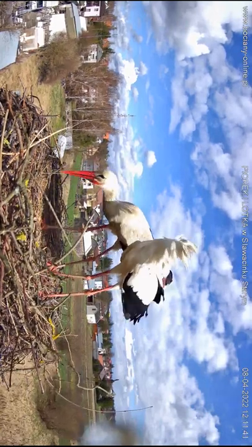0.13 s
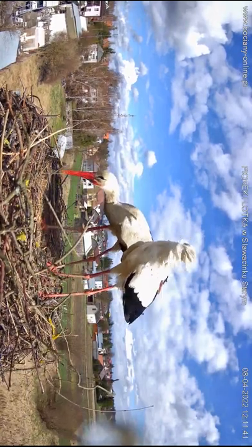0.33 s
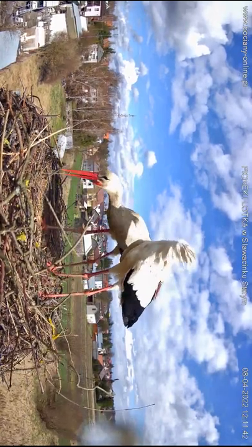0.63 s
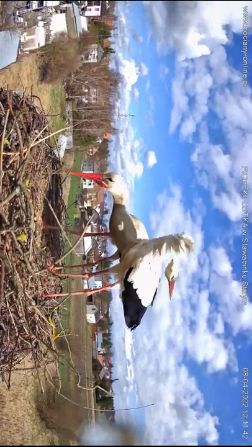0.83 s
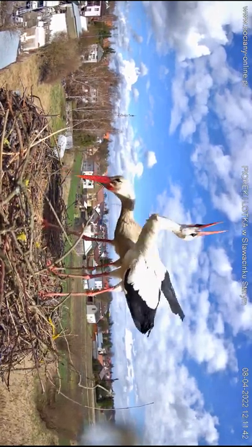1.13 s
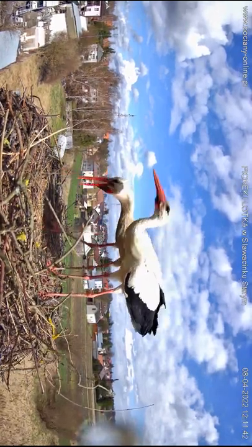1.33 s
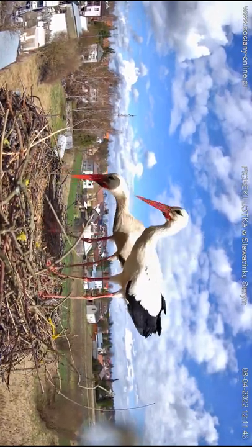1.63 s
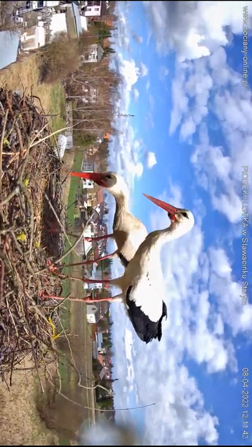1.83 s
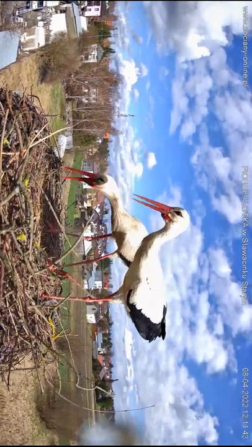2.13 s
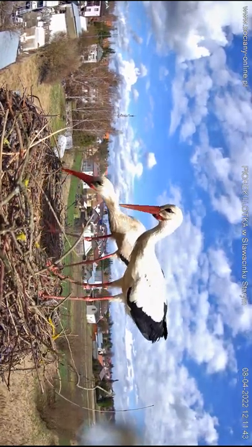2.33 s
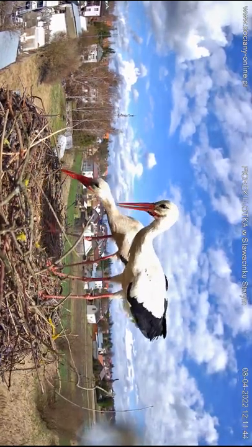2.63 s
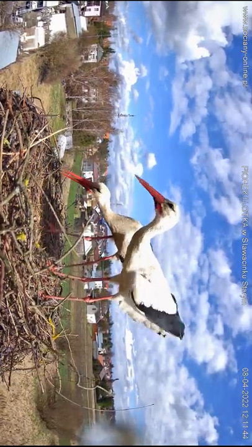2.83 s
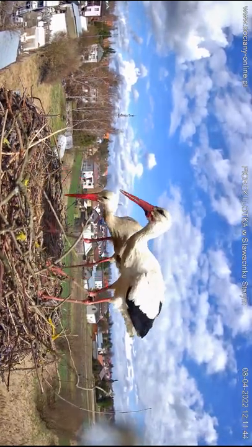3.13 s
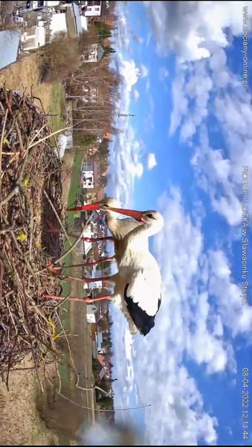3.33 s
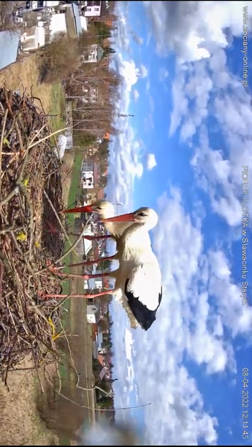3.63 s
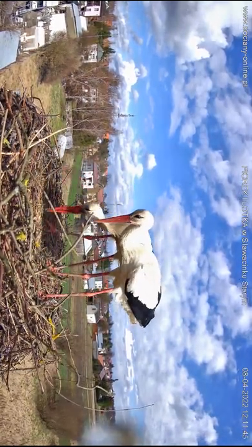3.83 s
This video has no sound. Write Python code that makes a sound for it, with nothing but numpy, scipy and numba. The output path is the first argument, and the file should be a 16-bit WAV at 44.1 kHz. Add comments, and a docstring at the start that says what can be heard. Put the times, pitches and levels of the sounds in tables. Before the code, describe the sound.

Two storks clatter their bills at an outdoor nest, one clapping hollowly, the other ticking dryly. Loud clacks overload the close microphone, with brief hisses between them, then thin to a few ticks over gusting wind and low rumble.

```python
"""Two storks clatter their bills on a nest, over gusting wind, a faint far hum and a low rumble.
From the start, one keeps its head low and claps hollowly; the other ticks dryly, head thrown back.
As that head comes forward, the ticks slow down and fill out, and loud clacks overload a close microphone.
Midway, three short hisses pass between the clacks. The hollow claps stop at about two seconds;
the other stork ends with a few spaced ticks, and the last second is left to the background."""
import sys
import numpy as np
from scipy import signal
from scipy.fft import irfft
from scipy.io import wavfile
from scipy.ndimage import uniform_filter1d
from numba import njit

SR = 44100
rng = np.random.default_rng(int(sys.argv[2]) if len(sys.argv) > 2 else 0)


def int16_out(signal):
    """Quantize to a 16-bit WAV file."""
    q = np.round(np.clip(np.atleast_2d(signal).T, -1, 1) * 32767)
    wavfile.write(sys.argv[1], SR, q.astype(np.int16))


N = 176400  # 4 seconds

# how the wind swells and drops: (time [s], bass level [dB], rush level [dB])
GUST_LEVELS = [(0, 9.5, 10.5), (.06, 6, 6), (.11, 8, 8), (.15, 5, 6), (.55, -0.5, 3), (.8, -1, 4),
               (1.08, 0, 1), (1.2, -8, -9.5), (1.34, -6.5, -10), (1.44, -8, -3.5), (1.7, -4, -5),
               (1.89, -9.5, -8), (2.07, 1.5, -0.5), (2.12, 5.5, 5.5), (2.16, 7, 8), (2.19, 1.5, 2.5),
               (2.38, 1, 2.5), (2.52, 6.5, 5), (2.65, 7.5, 2.5), (2.73, -1, 1.5), (2.88, -4.5, -3),
               (2.95, -3.5, -1), (3.22, 1.5, 2), (3.36, -5.5, -6.5), (3.42, -3, 0), (3.56, -1, -1.5),
               (3.65, -3, -0.5), (3.72, -5, -4), (4, 0, 0)]


def bowed_stork():
    """Hollow claps: the bill snaps shut and rings the pouch (loose skin below it) and the throat."""
    # the claps: (time [s], level [dB])
    claps = [(0.084, 0), (0.217, 1.5), (0.3471, 1.5), (0.4772, 2.5), (0.6125, 4), (0.7459, 5),
             (0.8789, 6.5), (1.015, 6.5), (1.1509, 5.5), (1.2857, 5.5), (1.4182, 6), (1.5528, 6.5),
             (1.686, 6), (1.8183, 5), (1.9642, 4)]
    # the pitches sink as the neck stretches:
    # (time [s], throat pitch [Hz], pouch pitch [Hz], pouch level [dB], throat level [dB])
    stretch = [(.08, 1660, 2437, -2.5, 3.5), (.22, 1680, 2454, -4.5, 2.5), (.48, 1665, 2446, 0.5, 3),
               (.75, 1589, 2424, 2, 1), (1.15, 1582, 2318, 1, 0), (1.69, 1575, 2290, 1.5, -0.5),
               (1.96, 1490, 2246, 4, -1.5)]
    # bright, harsh upper tones of the overloaded clap: (pitch [times the pouch pitch], level [dB])
    harsh_tones = [(1.298, -4.5), (1.648, -4)]
    out, t = np.zeros(N), np.arange(SR // 20) / SR
    for start, db in claps:
        throat_hz, pouch_hz, pouch_db, throat_db = values_at(stretch, start)
        # the pouch's pitch scoops up as the bill seals
        pouch = ring(t, pouch_hz, t60=0.013, rise_s=0.004, scoop=0.15, scoop_s=0.0022, ease=1.724)
        throat = ring(t, throat_hz, t60=0.017, rise_s=0.0021)
        tones = amp(16 + pouch_db) * pouch + amp(throat_db) * throat
        for ratio, tone_db in harsh_tones:
            strength = amp(tone_db + 2.1 * rng.standard_normal())
            tones += strength * ring(t, ratio * pouch_hz, t60=0.012, rise_s=0.0014)
        low_knock = amp(-19.5) * ring(t, hz=727, t60=0.019, rise_s=0.0011)
        snap = amp(-17) * crack(t, t60=0.012, tail_db=-3.5, tail_t60=0.031) + amp(-14) * bill(t)
        add(out, start, amp(db) * (tones + low_knock + snap))
    return out


def displaying_stork():
    """Dry ticks that slow down and ring longer as the head comes forward."""
    # the claps: (time [s], level [dB], extra level of the snap [dB])
    claps = [(0.105, -7.5, -1.5), (0.2035, -6, 1), (0.304, -4.5, -1), (0.4036, -6.5, 1),
             (0.5055, -3.5, 1.5), (0.6104, -3, -7), (0.7195, -8, 2), (0.8344, -7, 2.5), (0.955, -3, 3),
             (1.085, -3, -2), (1.2247, -3, -1), (1.3709, -1, -5), (1.52, -15.5, 9.5), (1.6601, 5, -3),
             (1.806, 4, 0.5), (1.954, 3.5, -1), (2.1019, 7, -6), (2.2517, 3, -1), (2.4008, -23, 10.5),
             (2.8542, -29, 14.5), (3.025, -7.5, 0)]
    # how the ringing changes as the head moves:
    # (time [s], neck pitch [Hz], neck level [dB], pouch pitch [Hz], pouch fade time [s])
    posture = [(0, 1090, -7, 1970, 0.0054), (.95, 1100, -8, 2130, 0.0039), (1.22, 1180, -9, 2300, 0.0064),
               (1.37, 1070, -9, 2420, 0.0081), (1.66, 850, -10, 2750, 0.0091),
               (2.25, 850, -10.5, 2640, 0.01), (3.03, 770, -8, 2440, 0.0093)]
    # loose second contacts of the bill after some claps: (time [s], level [dB])
    rebounds = [(.425, -24), (0.964, -30), (1.095, -27), (1.236, -34), (1.532, -33), (2.125, -29),
                (2.267, -18.5), (2.42, -31), (2.863, -28.5), (3.039, -26.5)]
    out, t = np.zeros(N), np.arange(SR // 20) / SR
    for start, db, snap_db in claps:
        neck_hz, neck_db, pouch_hz, t60 = values_at(posture, start)
        pouch = amp(13.5) * ring(t, pouch_hz, t60, rise_s=0.002, scoop=0.3, scoop_s=0.002, ease=1.35)
        neck = amp(neck_db) * ring(t, neck_hz, t60=0.017, rise_s=0.00047)
        snap = amp(-11.5) * crack(t, t60=0.0095, tail_db=-16, tail_t60=0.03) + amp(-2) * bill(t)
        snap += amp(-9.5) * ring(t, hz=3760, t60=0.0011, rise_s=0.00008)
        add(out, start, amp(db) * (pouch + neck + amp(snap_db) * snap))
    for start, db in rebounds:
        add(out, start, amp(db) * (crack(t, t60=0.017, tail_db=-22, tail_t60=0.018) + bill(t)))
    dull_hz = 9800  # the bill points away, so its highest sounds are soft
    return signal.lfilter(*signal.butter(2, dull_hz, fs=SR), out)


def bill(t, pitch_spread=0.031, level_spread_db=2):
    """The hard bill rings briefly, a little differently at each clap."""
    # the bill's own tones: (pitch [Hz], level [dB], fade time [s])
    tones = [(2790, -16, 0.011), (4230, -8.5, 0.012), (5400, -12.5, 0.012), (7460, -14.5, 0.0085),
             (9200, -13, 0.0028)]
    out = np.zeros(len(t))
    for hz, db, t60 in tones:
        detune, extra_db = rng.standard_normal(2) * (pitch_spread, level_spread_db)
        out += amp(db + extra_db) * ring(t, hz * (1 + detune), t60, rise_s=0.00027)
    return out


def crack(t, t60, tail_db, tail_t60):
    """The two halves of the bill meet: a very short burst of noise with a rattling tail."""
    # tone colour of the burst: (frequency [Hz], level [dB])
    spectrum = [(200, 1), (700, -1.5), (1200, -6.5), (2500, 9), (4300, 0.5), (6000, -13), (8000, -6.5),
                (11000, -36), (16000, -52)]
    return noise(spectrum, len(t)) * (fade(t, t60) + amp(tail_db) * fade(t, tail_t60))


def nest(claps):
    """The twigs scatter each clap into a short, bright echo."""
    t = np.arange(SR // 5) / SR
    tail = rng.standard_normal(len(t)) * fade(t, t60=0.093)
    echo = signal.fftconvolve(claps, tail / np.linalg.norm(tail))[:N]
    return amp(-33) * high_pass(echo, hz=3230)


def hisses(edge_s=0.017, rasp_per_s=360, cutoff_hz=10200):
    """Raspy breath rings in the throat at a rising pitch, with a deeper and an upper band following it."""
    # the hisses: (start [s], length [s], level [dB], swell [dB],
    # first throat pitch [Hz], last throat pitch [Hz], upper pitch [Hz])
    breaths = [(1.362, 0.19, -32.5, -0.5, 2050, 3005, 3480), (1.907, 0.059, -33, 1, 2750, 3100, 4680),
               (1.985, .14, -38, 2, 2750, 3290, 4640)]
    # tone colour of the rushing air: (frequency [Hz], level [dB])
    spectrum = [(800, -25), (2200, 13), (5000, 3), (9400, -10), (11500, -25)]
    out = np.zeros(N)
    for start, length, db, swell_db, first_hz, last_hz, upper_hz in breaths:
        t = np.arange(round(length * SR)) / SR
        progress = t / length - 0.5  # zero halfway through the hiss
        throat_hz = np.linspace(first_hz, last_hz, len(t))
        breath = whistle(throat_hz) + amp(-6) * whistle(0.45 * throat_hz)
        breath += amp(-0.5 + 6 * progress) * whistle(upper_hz * np.sqrt(throat_hz / throat_hz.mean()))
        breath += amp(-18) * whistle(np.full(len(t), 8700))
        rasp = amp(2 * wander(len(t), round(SR / rasp_per_s)))
        breath += amp(-1) * noise(spectrum, len(t))
        soft_edges = np.clip(np.minimum(t, length - t) / edge_s, 0, 1)
        add(out, start, amp(db + swell_db * progress) * soft_edges * unit(rasp * breath))
    return signal.sosfilt(signal.butter(8, cutoff_hz, fs=SR, output="sos"), out)


def whistle(hz, width=0.135):
    """A breathy band of noise that follows the pitch curve hz; higher bands are wider."""
    pole = np.exp(-np.pi * width * np.mean(hz) / SR)
    slow_a, slow_b = signal.lfilter([1], np.poly([pole, pole]), rng.standard_normal((2, len(hz))))
    phase = 2 * np.pi * np.cumsum(hz) / SR
    return unit(slow_a * np.cos(phase) - slow_b * np.sin(phase))


def wind(level_db=-33.5, patch_db=1.36, flutter_db=0.7):
    """Rushing air that swells in gusts, with drifting patches of tone colour and a slight flutter."""
    # tone colour of the wind: (frequency [Hz], level [dB])
    spectrum = [(59, -17), (100, -7), (600, -4), (891, -2.5), (1330, 0), (1830, -7.5), (2220, -6.5),
                (2690, -13), (4380, -22), (6420, -35), (16000, -63.5)]
    hz, t, slices = signal.stft(noise(spectrum, N), SR, nperseg=512, noverlap=384)
    bass_db, rush_db = values_at(GUST_LEVELS, t)
    rush_share = spectrum_at([(250, 0), (1200, 1)], hz)  # blends from bass to rush
    gust_db = np.outer(1 - rush_share, bass_db) + np.outer(rush_share, rush_db)
    patches = uniform_filter1d(rng.standard_normal(slices.shape), size=6, axis=0)
    patches = unit(uniform_filter1d(patches, size=16, axis=1))
    gain = amp(level_db + gust_db + patch_db * patches + flutter_db * wander(len(t), 14))
    return signal.istft(slices * gain, SR, nperseg=512, noverlap=384)[1][:N]


def far_hum(hz=619.5, waver_hz=5):
    """A faint, wavering tone that swells and drops with the wind."""
    _, rush_db = values_at(GUST_LEVELS, np.arange(N) / SR)
    pitch_hz = hz + waver_hz * wander(N, 2500)
    return amp(-47 + rush_db) * np.sin(2 * np.pi * np.cumsum(pitch_hz) / SR)


def rumble():
    """Deep noise that slowly sinks and swells under the wind."""
    # tone colour of the rumble: (frequency [Hz], level [dB])
    spectrum = [(15, 1), (35, 2.5), (55, -3), (80, -7.5), (150, -16), (400, -51)]
    # its loudness: (time [s], level [dB])
    levels = [(0, -39.5), (.9, -43.5), (1.3, -47.5), (1.9, -44.5), (2.2, -40.5), (2.8, -40.5), (3.1, -45),
              (4, -45)]
    return amp(values_at(levels, np.arange(N) / SR)[0]) * noise(spectrum, N)


def ring(t, hz, t60, rise_s, scoop=0, scoop_s=1, ease=1):
    """A tone that swells and dies away; it starts flat by the fraction scoop and slides up to hz."""
    cycles = hz * (t - scoop * scoop_s * (1 - np.exp(-t / scoop_s)))
    swell = (1 - np.exp(-t / rise_s)) ** ease
    return swell * fade(t, t60) * np.sin(2 * np.pi * cycles)


def fade(t, t60):
    """Dies away by 60 dB in the fade time t60, in seconds."""
    return np.exp(-np.log(1000) * t / t60)


def noise(spectrum, size):
    """Noise of strength 1 with the given tone colour."""
    hz = np.fft.rfftfreq(size, 1 / SR)
    phases = np.exp(2j * np.pi * rng.random(len(hz)))
    return unit(irfft(amp(spectrum_at(spectrum, hz)) * phases, size))


def wander(size, smoothing):
    """A random wobble; more smoothing makes it slower."""
    return unit(uniform_filter1d(rng.standard_normal(size), smoothing))


def spectrum_at(spectrum, hz):
    """Reads between a table's frequencies, giving each octave equal room."""
    frequencies, levels = np.transpose(spectrum)
    return np.interp(np.log(hz + 1), np.log(frequencies), levels)


def values_at(table, time):
    """Reads a table's columns at the given time."""
    times, *columns = np.transpose(table)
    return [np.interp(time, times, column) for column in columns]


def amp(db):
    """Turns decibels into a multiplier."""
    return 10 ** (np.asarray(db) / 20)


def unit(x):
    """Scales a signal to an average (RMS) strength of 1."""
    return x / np.sqrt(np.mean(x ** 2) + 1e-20)


def add(mix, start_s, sound):
    """Mixes a sound in at its start time."""
    part = mix[max(round(start_s * SR), 0):][:len(sound)]
    part += sound[:len(part)]


def high_pass(x, hz):
    """Weakens everything below hz."""
    return signal.lfilter(*signal.butter(2, hz, "high", fs=SR), x)


def scene():
    """Both storks, their nest and the background, in one channel."""
    claps = high_pass(bowed_stork() + displaying_stork(), hz=557)  # a bill is too small to give off bass
    return (claps + nest(claps) + hisses() + wind() + far_hum() + rumble())[None]


@njit
def overload(x, top, bottom, bias_hz):
    """Flattens the wave's tops and bottoms unequally; a shifting bias keeps the wave centred."""
    rate = 2 * np.pi * bias_hz / SR
    y, bias = np.zeros(len(x)), 0.
    for i in range(len(x)):
        shifted = x[i] - bias
        limit = top if shifted > 0 else bottom
        y[i] = shifted / (1 + (shifted / limit) ** 16) ** (1 / 16)
        bias += rate * (y[i] - x[i])
    return y


def record(dry, thump_hz=655, cutoff_hz=16300):
    """The microphone input overloads on loud clacks, blocks most of their thump and cuts the top treble."""
    clipped = overload(dry[0], top=0.77, bottom=0.39, bias_hz=322)
    thump = signal.filtfilt(*signal.butter(2, thump_hz, fs=SR), clipped - dry[0])
    treble_cut = signal.firwin(255, cutoff_hz, window=("kaiser", 9), fs=SR)
    return signal.oaconvolve(clipped - 0.75 * thump, treble_cut, "same")[None]


dry = scene()
out = record(dry)
int16_out(out)
```